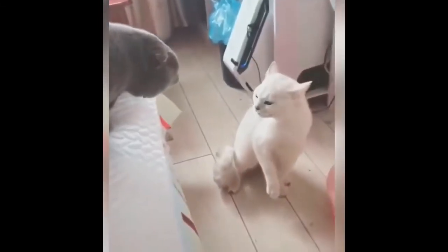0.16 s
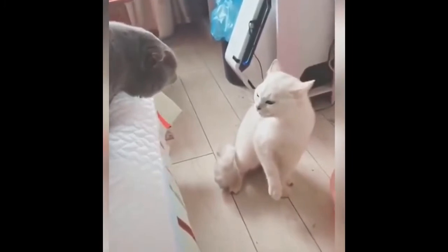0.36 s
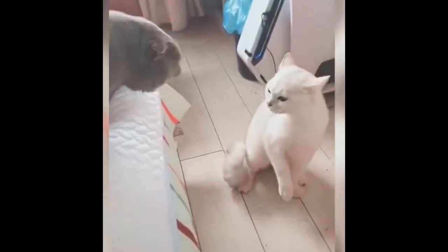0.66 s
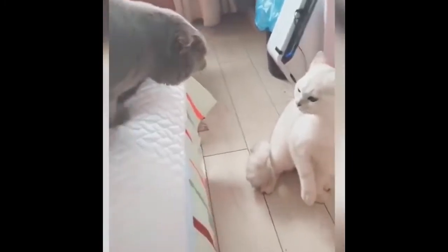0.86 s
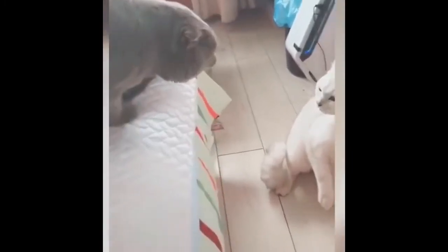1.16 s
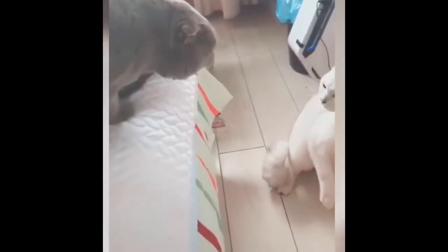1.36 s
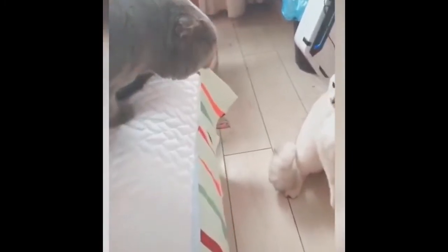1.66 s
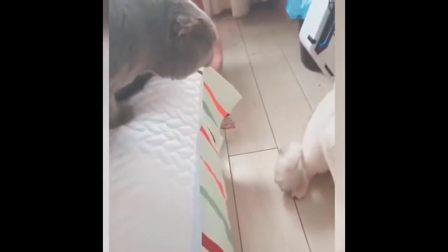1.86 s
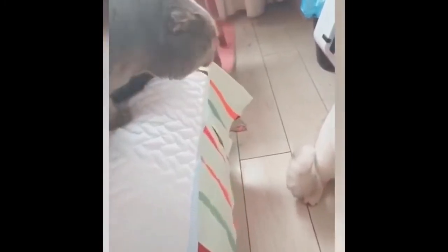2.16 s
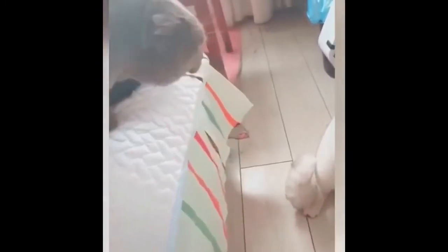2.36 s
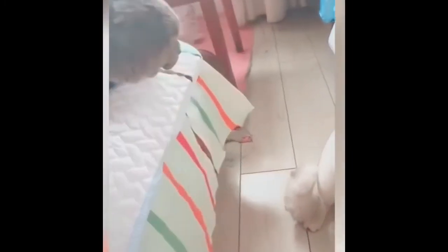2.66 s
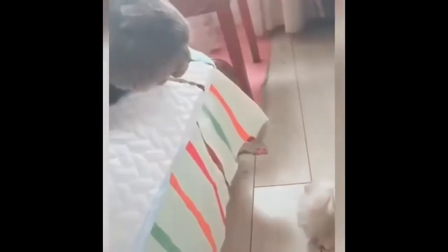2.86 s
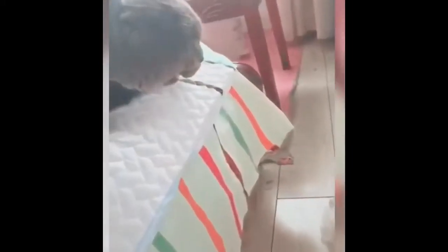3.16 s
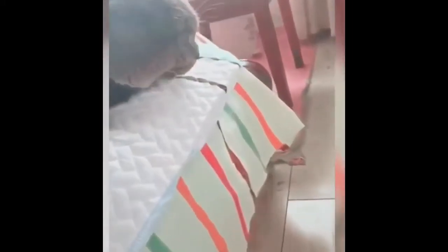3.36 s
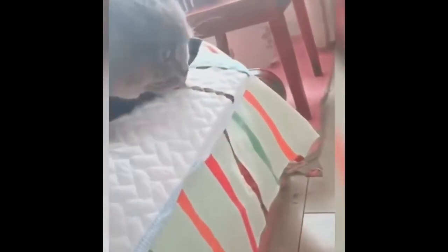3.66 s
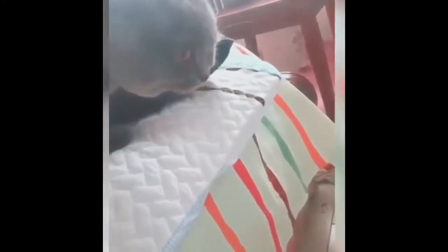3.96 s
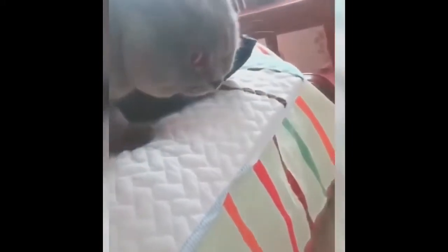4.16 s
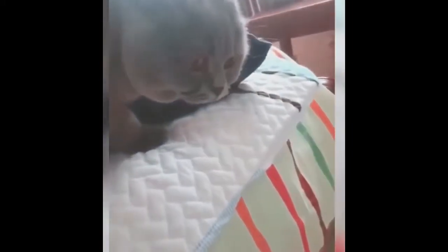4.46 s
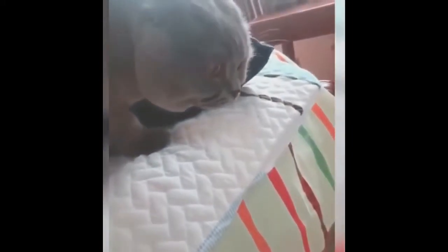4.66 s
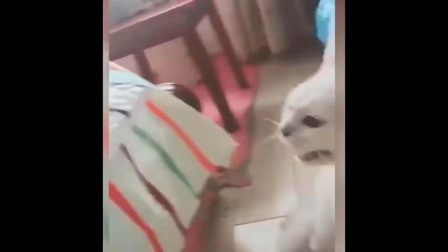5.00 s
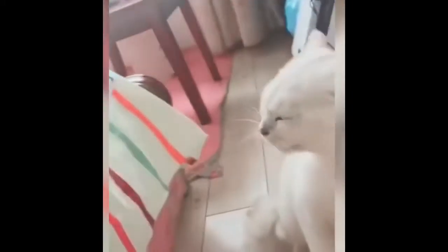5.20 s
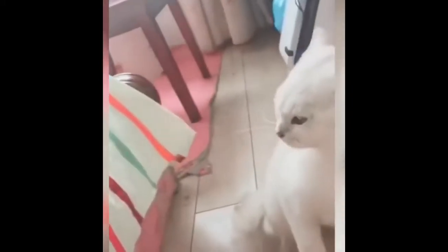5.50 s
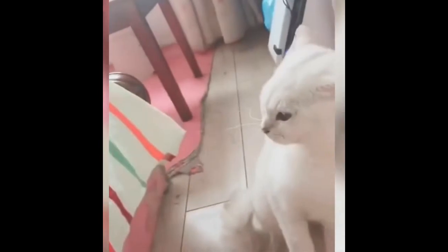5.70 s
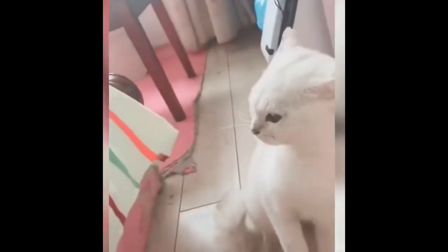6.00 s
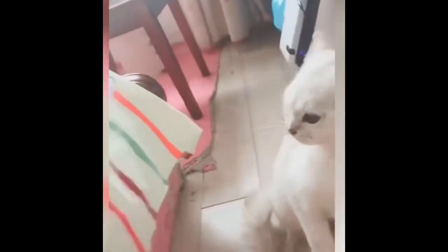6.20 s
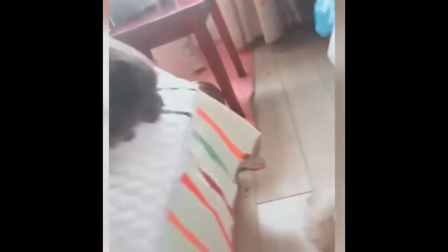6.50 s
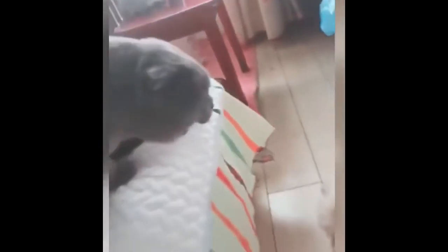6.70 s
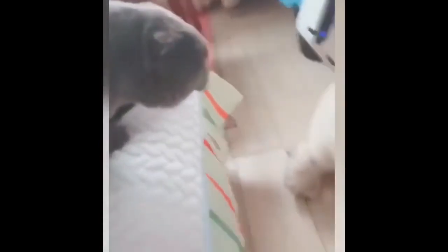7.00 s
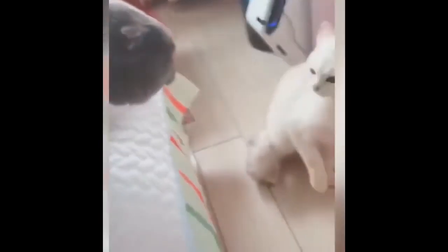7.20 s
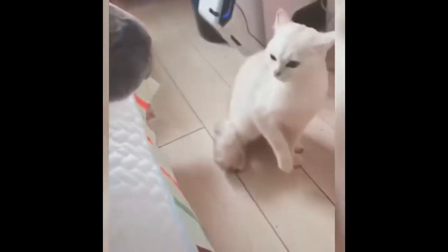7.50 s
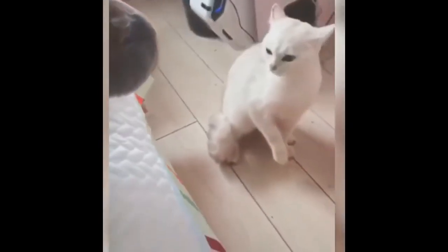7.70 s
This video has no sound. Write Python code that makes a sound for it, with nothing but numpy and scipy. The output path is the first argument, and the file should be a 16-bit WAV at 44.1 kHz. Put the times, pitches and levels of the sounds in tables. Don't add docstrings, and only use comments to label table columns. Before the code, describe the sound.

Close phone pickup in a small tiled bedroom. A cat is already yowling, high, nasal and strained, sliding down in pitch for over three seconds. In the short quiet gap come tiny claw and lip ticks and faint nose whistles. A second cat moans with closed jaws, rising, then the first yowls again with a harsh onset, arching up and sinking until cut off. Low rumble and soft hiss sit underneath.

```python
import sys
import numpy as np
from scipy import signal
from scipy.fft import rfft, irfft, next_fast_len
from scipy.io import wavfile
from scipy.ndimage import uniform_filter1d, map_coordinates

SR = 44100
rng = np.random.default_rng(int(sys.argv[2]) if len(sys.argv) > 2 else 0)


def rack_gain(trim_db):
    fader = np.asarray(trim_db, float)
    return 10 ** (fader / 20)


def unload_wav(signal):
    wavfile.write(
        sys.argv[1],
        SR,
        np.round(np.clip(np.atleast_2d(signal).T, -1, 1) * 32767).astype(np.int16),
    )


N = 346185


def unit(x):
    return x / np.sqrt(np.mean(x ** 2) + 1e-20)


def along(points, hz):
    f, v = np.transpose(points)
    return np.interp(np.log(hz + 1), np.log(f + 1), v)


def curves(rows, t):
    s, *columns = np.transpose(rows)
    return [np.interp(t, s, column) for column in columns]


def wobble(rate, size):
    knots = rng.standard_normal(int(size * rate / SR) + 4)
    return map_coordinates(knots, [np.arange(size) * rate / SR])


def noise(spectrum):
    m = next_fast_len(N)
    colour = rack_gain(along(spectrum, np.fft.rfftfreq(m, 1 / SR)))
    return unit(irfft(rfft(rng.standard_normal(m)) * colour, m)[:N])


def resonance(hz, centre_hz, width_hz):
    return (hz * width_hz) ** 2 / ((centre_hz ** 2 - hz ** 2) ** 2 + (hz * width_hz) ** 2)


GLIDE_S = 0.09
STEADY_ROUGH, ROUGH_PER_GLIDE, ROUGHEST, ONSET_S = 0.02, 0.05, 0.4, 0.09


def folds(contour, slips, doublings, onset_rough, t):
    corner = max(1, round(GLIDE_S / (t[1] - t[0])))
    pitch = uniform_filter1d(curves(contour, t)[0], size=corner, mode="nearest")
    for s, drop_hz, half_s in slips:
        if t[0] <= s <= t[-1]:
            pitch = pitch - drop_hz * ((1 + np.tanh((t - s) / half_s)) / 2 - (drop_hz < 0))
    glide = np.abs(np.gradient(np.log(pitch), t))
    onset = onset_rough * np.exp((t[0] - t) / ONSET_S)
    rough = np.minimum(STEADY_ROUGH + ROUGH_PER_GLIDE * glide + onset, ROUGHEST)
    half = 0 * t
    for s, size, rise_s, fall_s in doublings:
        half = half + size * np.exp(np.minimum((t - s) / rise_s, (s - t) / fall_s))
    return pitch, rough, half * (half > 0.02)


# (frequency [Hz], level [dB])
TREBLE = [(2000, -12), (3800, 3), (4500, -5), (5300, -4.5), (6000, -10.5), (7000, -5.5), (8000, -9.5),
          (8900, -13.5), (9800, -9.5), (10600, -14), (11500, -7.5), (12300, -23), (13300, -9.5),
          (14000, -26.5)]
# (frequency [Hz], level [dB])
NOSE_AIR = [(3500, -32), (4700, -18), (5300, 3), (5900, -10), (6500, 4.5), (7100, -16), (7500, -34.5),
            (9000, -54)]
TOP_HZ = 14100
SHUT_HZ, SHUT_SPAN_HZ = 1780, 350
SIDE_BRANCH, BRANCH_DEPTH, BRANCH_WIDTH_HZ = 0.878, 0.93, 800
SINUS_HZ = 1150
MUFFLE_HZ, MUFFLE_DB = 7250, -10
PULSE_NULL, NULL_WIDTH = 10, 0.7
SWAY, SHIVER = 0.8, 22
LEAK_DB_PER_OCTAVE, LEAK_HZ = -9, 520


def voice(contour, effort, tract, slips, doublings, chest, airway, onset_rough, faint_db,
          jitter, flutter_db, breath_db, nose_db, throat_width, sinus, surges):
    start, stop = round(contour[0][0] * SR), min(N, round(contour[-1][0] * SR))
    t = np.arange(start, stop) / SR
    step = 64
    slow = t[::step]

    mouth_db, throat_db, treble_db = curves(effort, slow)
    for s, db, half_s in surges:
        mouth_db = mouth_db + db * np.exp(-((slow - s) / half_s) ** 2)
    throat_db, treble_db = mouth_db + throat_db, mouth_db + treble_db
    mouth_hz, mouth_width, throat_hz, palate_hz = curves(tract, slow)
    pitch, rough, half = folds(contour, slips, doublings, onset_rough, slow)

    order = np.arange(1, 2 * TOP_HZ / pitch.min())[:, None] / 2
    hz = order * pitch
    half_lines = half ** 2 * np.clip(order / 5, 0, 1.3) ** 3
    present = np.where(order % 1, half_lines, order > 2) * (hz < TOP_HZ)

    shut = np.clip((SHUT_HZ - mouth_hz) / SHUT_SPAN_HZ, 0, 1)
    peaks = 1 + 25 * resonance(hz, palate_hz, 670)
    peaks += sinus * shut * resonance(hz, palate_hz + SINUS_HZ, 550)
    notch = np.abs(1 - BRANCH_DEPTH * shut * resonance(hz, SIDE_BRANCH * palate_hz, BRANCH_WIDTH_HZ))
    puff_null = np.exp(-((order - PULSE_NULL) / NULL_WIDTH) ** 2)
    notch *= 1 - 0.74 * puff_null * (1 - resonance(hz, palate_hz, 500))
    upper = rack_gain(2 * along(TREBLE, hz) + 2 * MUFFLE_DB * shut * (hz > MUFFLE_HZ)) * peaks * notch
    mouth = resonance(hz, mouth_hz, np.abs(mouth_width)) ** 2
    throat = resonance(hz, throat_hz, throat_width) ** 2
    power = 0
    for shape, db in [(mouth, mouth_db), (throat, throat_db), (upper, treble_db)]:
        power = power + rack_gain(2 * db) * shape * present / np.sum(shape * present, 0)

    power[[1, 3]] = rack_gain(2 * (along(chest, hz[[1, 3]]) + np.minimum(mouth_db - faint_db, 0)))
    power[[2, 4]] += rack_gain(2 * along(chest, hz[[2, 4]])) * half ** 2 * 0.2

    tremor = wobble(16 * step, len(slow)) + SHIVER * rough * wobble(70 * step, len(slow))
    cycle = 2 * np.pi * np.cumsum(np.interp(t, slow, pitch * (1 + jitter * tremor))) / SR
    turn = (cycle % (4 * np.pi)).astype(np.float32)
    tone = np.zeros(len(t))
    for k, p in zip(order[:, 0], power):
        if p.any():
            waver = wobble(30 * step, len(slow)) + SWAY * wobble(8 * step, len(slow))
            size = np.sqrt(2 * p) * rack_gain(flutter_db * min(k, 14) * waver)
            tone += np.interp(t, slow, size) * np.cos(np.float32(k) * turn - np.float32(0.25 * k * k))

    rough = np.interp(t, slow, rough)
    tone *= np.sqrt(1 - rough ** 2) + rough * (1.56 * wobble(280, len(t)) + 0.49 * wobble(900, len(t)))

    nose = rack_gain(nose_db) * np.interp(t, slow, shut) * noise(NOSE_AIR)[:len(t)]
    air = (noise(airway)[:len(t)] + nose) * (1 + 1.1 * np.cos(cycle))
    leak_db = np.interp(t, slow, treble_db + LEAK_DB_PER_OCTAVE * np.log2(pitch / LEAK_HZ))
    tone += air * rack_gain(leak_db + breath_db) * (1 + 8 * rough + 2.0 * np.interp(t, slow, half))

    fade_in = (t - t[0]) / 3 + (start == 0)
    fade_out = (t[-1] - t) + (stop >= N - 2)
    out = np.zeros(N)
    out[start:stop] = tone * np.clip(np.minimum(fade_in, fade_out) / 0.019, 0, 1)
    return out


# (time [s], pitch [Hz])
PITCH_ONE = [(0, 683.3), (.85, 699.6), (1.25, 670.3), (1.6, 587.1), (1.88, 556.6), (2.06, 574.8),
             (2.45, 484), (2.88, 453.6), (3.47, 440.3)]
PITCH_TWO = [(5.05, 498), (5.4, 561.4), (5.7, 594.7), (6.0, 608.6), (6.3, 595.1), (6.7, 557.3), (7.15, 504),
             (7.58, 492), (7.85, 509.2)]
# (time [s], effort [dB], throat over effort [dB], treble strain over effort [dB])
EFFORT_ONE = [(0, -27, 6.5, -5.5), (.36, -27.5, 5.5, -9), (.8, -17.5, 0.5, -24.5),
              (1.12, -19, -12.5, -19.5), (1.6, -21, -23, -21), (2.37, -22, -17, -22),
              (2.95, -29.5, -5.5, -13), (3.421, -25, -6, -22.5), (3.47, -35, -19, -18)]
EFFORT_TWO = [(5.051, -39, -22, -41), (5.12, -32, -6, -13.5), (5.28, -19, -2.5, -7), (5.55, -18, -2.5, -10),
              (5.951, -15.5, -20.5, -11.5), (6.6, -19.5, -19, -20.5), (7.15, -23, -11, -23.5),
              (7.6, -16, -21.5, -27.5), (7.85, -19, -13.5, -27)]
# (time [s], mouth [Hz], mouth width [Hz], throat [Hz], palate [Hz])
AIRWAY_ONE = [(0, 2030, 300, 2670, 5500), (.8, 1920, 306.4, 2630, 5150), (1.121, 2340, 300, 2750, 6940),
              (1.299, 2177, 270, 4210, 6460), (1.58, 1895, 263.4, 3940, 6530),
              (1.95, 1740, 878, 3980, 6040), (2.3, 1620, 280, 3120, 5900), (2.95, 1338, 466, 2580, 5310),
              (3.47, 1410, 280, 2410, 5400)]
AIRWAY_TWO = [(5.05, 1480, 403, 3000, 5170), (5.2, 2526, 460, 3650, 4590), (5.35, 2052, 454, 2620, 4800),
              (5.58, 2122, 298, 3040, 4890), (5.78, 2390, 505, 3930, 4530), (6.45, 2056, 249, 3930, 4590),
              (6.7, 1803, 260, 3740, 6340), (7.3, 1734, 284, 2994, 5400), (7.85, 1757, 263, 2900, 5600)]
# (time [s], drop [Hz], half length [s])
YOWL_SLIPS = [
    (.02, -46.5, 0.05),
    (1.645, 46, 0.02),
    (2.15, 15, .02),
    (3.446, 45, .012),
    (5.09, -185, .04),
    (6.5, 23.5, .025),
    (6.77, 28, .035),
]
# (time [s], strength [0-1], rise [s], fall [s])
DOUBLINGS = [
    (2.0, .05, .1, .05),
    (5.26, .7, .045, .11),
    (5.78, .15, .6, .03),
    (7.64, .14, .025, .5),
    (7.85, .42, .1, .1),
]
# (frequency [Hz], level [dB])
YOWL_CHEST = [(385, -42.5), (430, -55.5), (520, -51.5), (690, -45), (790, -44), (900, -37), (1200, -31.5),
              (1400, -32.5)]
# (frequency [Hz], level [dB])
BREATH = [(2000, -32), (4000, -8), (7000, -1.5), (10000, -1.5), (14000, -9)]
# (time [s], level [dB], half length [s])
SURGES = [(.13, 4, 0.012), (.235, 2.5, 0.018), (.55, 3, 0.044), (.92, -0.5, 0.01), (1.2, 4, 0.024),
          (1.3, 4, 0.025), (1.46, -2.5, .015), (1.6, 3.5, 0.054), (1.87, -3, 0.021), (2.32, 3, 0.021),
          (5.4, -0.5, 0.042), (5.5, 1.5, 0.02), (6.37, 2.5, .04), (6.8, 2, .04)]


def yowls():
    calls = [(PITCH_ONE, EFFORT_ONE, AIRWAY_ONE), (PITCH_TWO, EFFORT_TWO, AIRWAY_TWO)]
    return sum(voice(*call, YOWL_SLIPS, DOUBLINGS, YOWL_CHEST, BREATH, onset_rough=0.06, faint_db=-33,
                     jitter=0.0035, flutter_db=0.2, breath_db=-24, nose_db=4.5,
                     throat_width=590, sinus=23, surges=SURGES) for call in calls)


# (time [s], pitch [Hz])
PITCH_TAIL = [(0, 345), (.2, 360.5), (.46, 367.4), (.6, 336.5), (.72, 305)]
PITCH_MOAN = [(4.35, 311.6), (4.5, 360), (4.7, 391.9), (4.9, 402.1), (5.19, 420.3), (5.3, 385), (5.4, 342)]
# (time [s], effort [dB], throat over effort [dB], treble strain over effort [dB])
EFFORT_TAIL = [(0, -67.5, 3.5, -17), (.3, -68.5, 8.5, -14.5), (.55, -60, -15, -21), (.72, -66.5, -7.5, -15)]
EFFORT_MOAN = [(4.35, -47.5, -20, -35), (4.48, -45, -4.5, -20.5), (4.719, -25, -19, -28.5),
               (4.81, -14, -28.5, -36.5), (5.0, -20, -28, -27), (5.21, -21, -28, -30.5),
               (5.27, -54, -10, -10), (5.36, -53, -38, -57), (5.4, -54, -15, -22)]
# (time [s], mouth [Hz], mouth width [Hz], throat [Hz], palate [Hz])
AIRWAY_TAIL = [(0, 1050, 200, 2980, 4500), (.5, 1088, 200, 3000, 4430), (.72, 950, 200, 2980, 4500)]
AIRWAY_MOAN = [(4.35, 1000, 400, 2240, 3600), (4.45, 1000, 306, 1860, 3740), (4.62, 1060, 180, 1930, 3740),
               (4.75, 1170, 150, 2400, 4300), (4.85, 1180, 150, 3130, 4400), (5.2, 1330, 150, 3100, 4750),
               (5.4, 970, 300, 2964, 4500)]
# (time [s], drop [Hz], half length [s])
MOAN_SLIPS = [
    (5.35, 79, 0.013),
]
# (frequency [Hz], level [dB])
FADING_CHEST = [(330, -62), (700, -58)]
MOAN_CHEST = [(300, -40), (360, -55.5), (395, -49), (420, -74), (640, -48.5), (740, -28.5), (800, -35.5),
              (850, -39)]


def moans():
    tail = (PITCH_TAIL, EFFORT_TAIL, AIRWAY_TAIL, [], [], FADING_CHEST, TREBLE)
    rising = (PITCH_MOAN, EFFORT_MOAN, AIRWAY_MOAN, MOAN_SLIPS, [], MOAN_CHEST, TREBLE)
    return sum(voice(*call, onset_rough, faint_db, jitter=0.0023, flutter_db=0.13, breath_db=-9, nose_db=-9,
                     throat_width=440, sinus=1.5, surges=[])
               for call, onset_rough, faint_db in [(tail, 0.05, -70), (rising, 0.15, -42)])


# (frequency [Hz], t60 [s])
BEDROOM = [(200, 0.2), (1500, 0.22), (2500, 0.38), (12000, 0.037)]


def bedroom(x):
    hz, t, z = signal.stft(rng.standard_normal(SR // 2), SR, nperseg=256)
    decay = rack_gain(-60 * t / along(BEDROOM, hz)[:, None])
    tail = signal.istft(z * decay, SR, nperseg=256)[1]
    delayed = np.pad(x, (200, 0))
    return signal.fftconvolve(delayed, tail / np.linalg.norm(tail))[:N]


# (time [s], level [dB])
BACKGROUND = [(0, -1), (1.6, -3), (2.2, -2), (3.4, 0), (3.7, 0.5), (4.3, -2.5), (5.2, -2.5), (6.3, -5.5),
              (6.9, -5), (7.85, -1)]
# (frequency [Hz], level [dB per Hz])
RUMBLE = [(15, -63), (28, -35), (40, 1.5), (52, 2.5), (68, -9), (88, -4), (125, -19.5), (200, -26),
          (260, -57)]
# (frequency [Hz], level [dB per Hz])
HISS = [(76, -34.5), (130, -5.5), (290, -1.5), (455, -11.5), (586, -9.5), (2090, -16.5), (2800, -16.5),
        (3550, -21.5), (14000, -30.5)]


def background():
    gain_db, = curves(BACKGROUND, np.arange(N) / SR)
    rumble = rack_gain(-50.5 + 1.6 * wobble(2.7, N)) * noise(RUMBLE)
    hiss = rack_gain(-61) * noise(HISS)
    return rack_gain(gain_db) * (rumble + hiss)


def knocks(events, crack):
    out, t = np.zeros(N + SR), np.arange(SR // 4) / SR
    for s, db, hz, t60 in events:
        puff = uniform_filter1d(rng.standard_normal(len(t)), max(1, int(SR / hz / 4)))
        ring = np.sin(2 * np.pi * hz * t) + crack * puff
        out[round(s * SR):][:len(t)] += rack_gain(db - 60 * t / t60) * ring
    return out[:N]


# (time [s], peak level [dB], frequency [Hz], t60 [s])
BUMPS = [
    (2.727, -41.5, 280, 0.092),
    (7.676, -45, 275, 0.048),
]


def bumps():
    return knocks(BUMPS, crack=4.1)


# (middle time [s], half length [s], frequency [Hz], level [dB])
WHISTLE = [
    (3.68, .1, 2770, -78),
    (4.09, .07, 2810, -68.5),
    (4.215, .04, 2800, -73.5),
]


def whistle():
    t = np.arange(N) / SR
    sniffs = np.zeros(N)
    for s, half_s, hz, db in WHISTLE:
        sniffs += rack_gain(db + 7) * np.exp(-((t - s) / half_s) ** 4) * np.sin(2 * np.pi * hz * t)
    return (0.49 + 0.53 * wobble(48, N)) * sniffs


# (time [s], peak level [dB], frequency [Hz], t60 [s])
TICKS = [
    (3.775, -59.5, 2490, 0.027),
    (3.79, -52, 3000, .03),
    (3.885, -56.5, 1802, 0.018),
    (4.002, -48, 1160, 0.026),
    (4.003, -57, 4630, .02),
    (4.234, -60, 5200, 0.016),
    (4.235, -55, 1330, 0.018),
]


def ticks():
    return knocks(TICKS, crack=0.8)


def thin_faint(x, near_db, far_db, depth_db, whim_db):
    z = signal.stft(x, nperseg=2048)[2]
    power = np.abs(z) ** 2
    fine = uniform_filter1d(power, size=4, axis=1)
    draws = rng.standard_normal((z.shape[1] // 12 + 1, z.shape[2] // 2 + 1))
    cells = np.kron(draws, np.ones((12, 2)))[:z.shape[1], :z.shape[2]]
    near = rack_gain(2 * near_db) * uniform_filter1d(power, size=48, axis=1)
    far = rack_gain(2 * far_db) * power[:, 30:].mean(1, keepdims=True)
    threshold = (near + far) * rack_gain(2 * whim_db * cells)
    keep = fine ** 3 / (fine ** 3 + np.abs(threshold) ** 3 + 1e-60)
    keep[:, :22] = 1
    return signal.istft(z * (keep + (1 - keep) * rack_gain(depth_db)), nperseg=2048)[1][:, :N]


def scene():
    near = yowls() + moans() + bumps() + whistle() + ticks()
    return (near + rack_gain(-13.5) * bedroom(near) + background())[None]


def top_cut(x):
    return signal.sosfilt(signal.butter(12, 14100, fs=SR, output="sos"), x)


def record(dry):
    thinned = thin_faint(dry, near_db=-32, far_db=-35, depth_db=-14, whim_db=5)
    return top_cut(thinned)


dry = scene()
out = record(dry)
unload_wav(out)
```